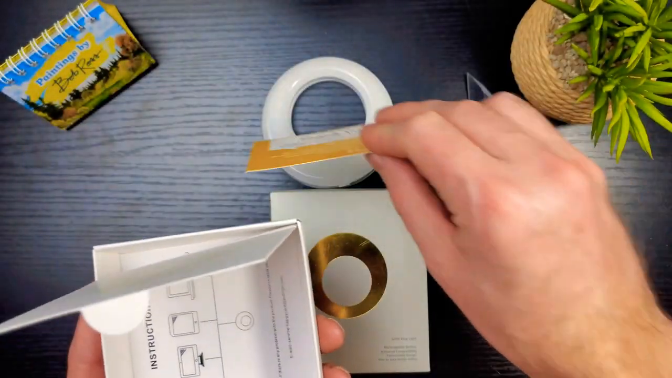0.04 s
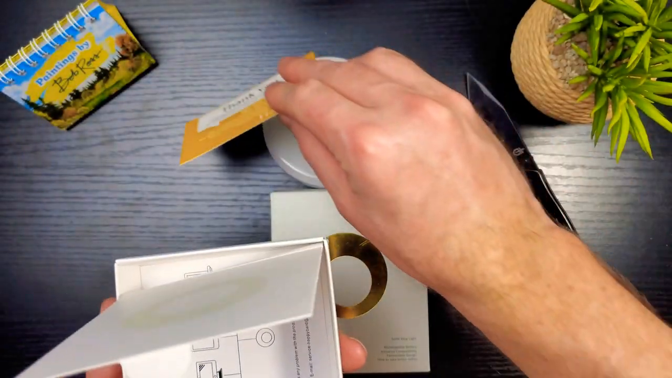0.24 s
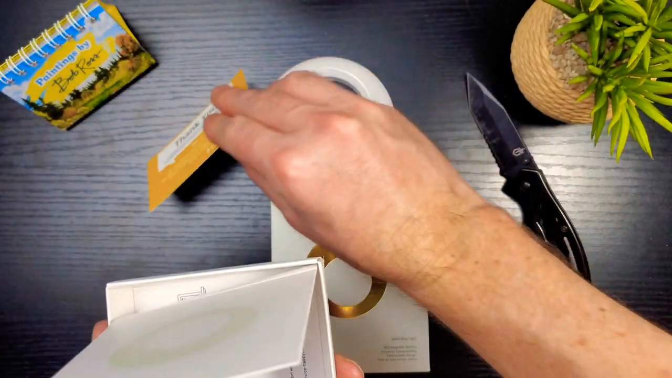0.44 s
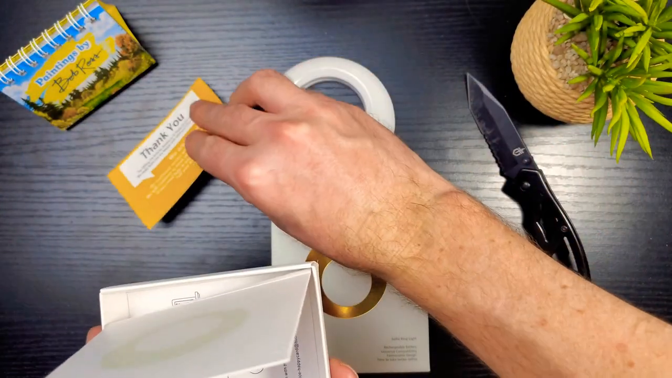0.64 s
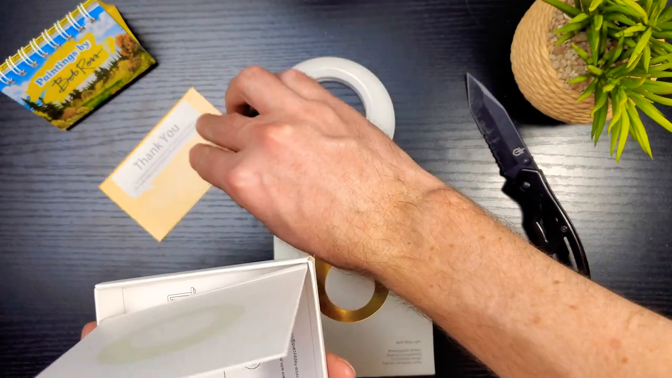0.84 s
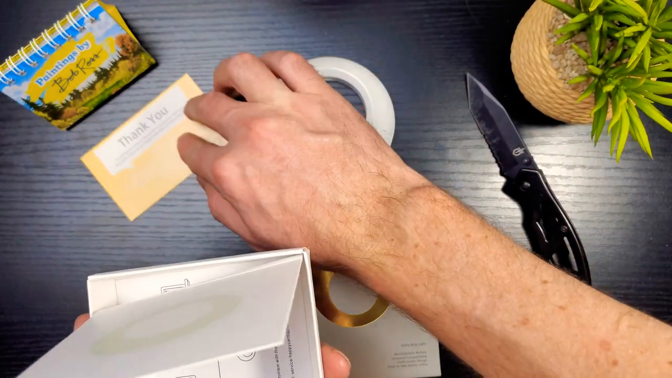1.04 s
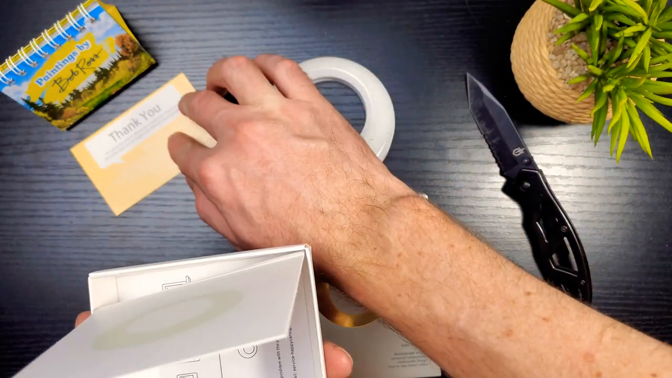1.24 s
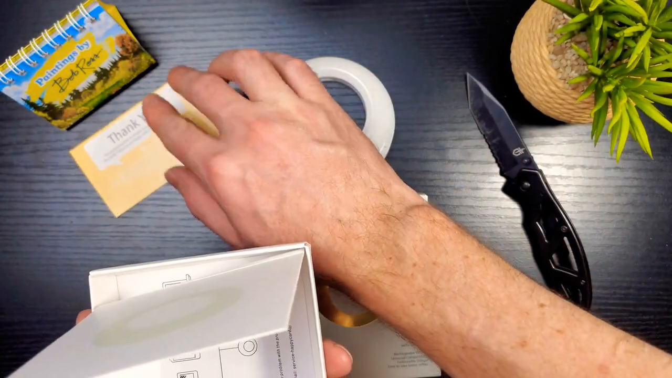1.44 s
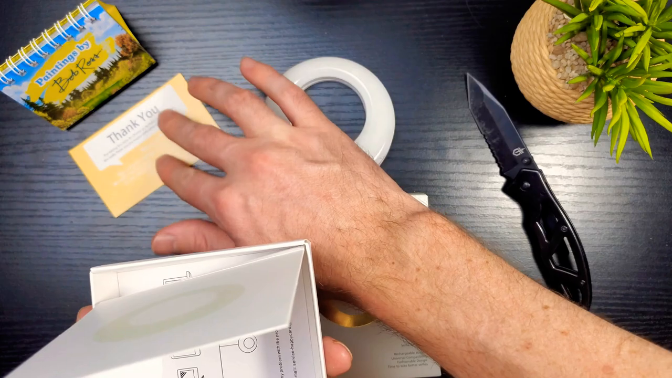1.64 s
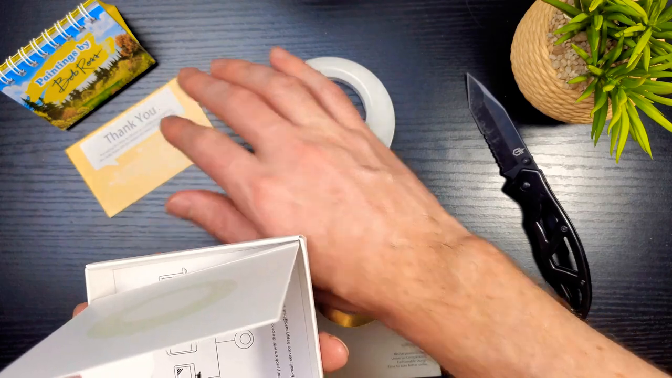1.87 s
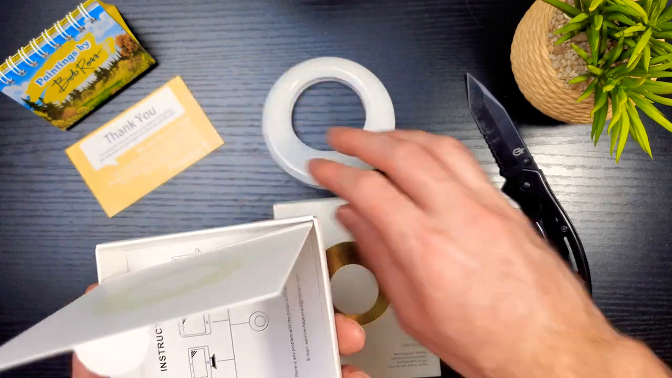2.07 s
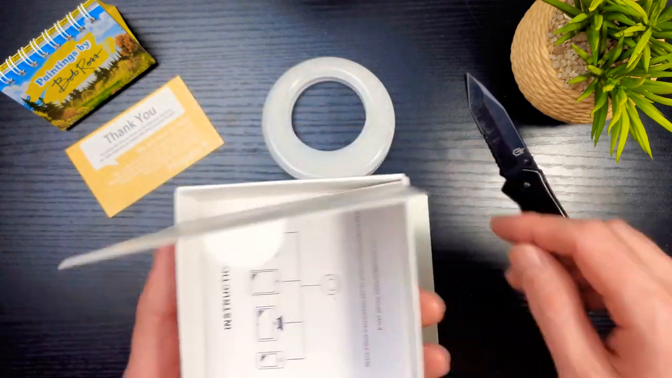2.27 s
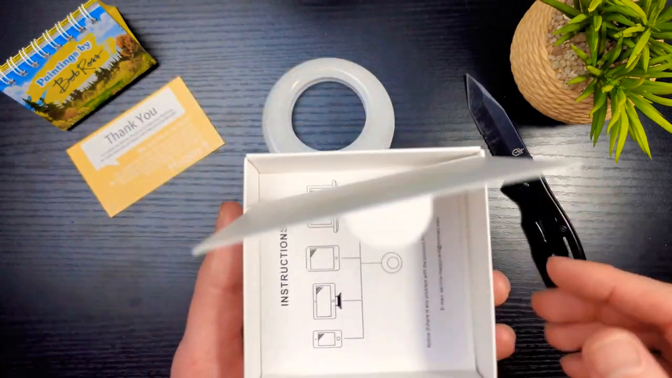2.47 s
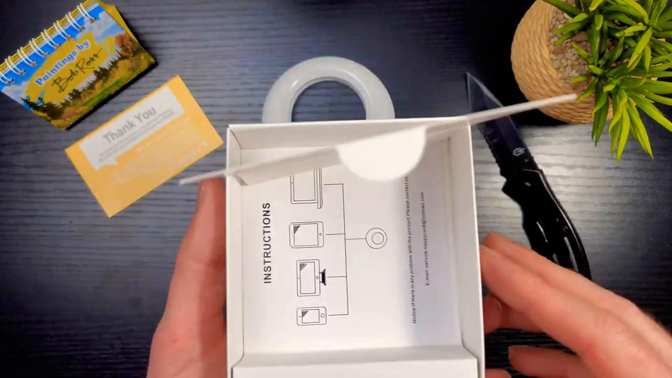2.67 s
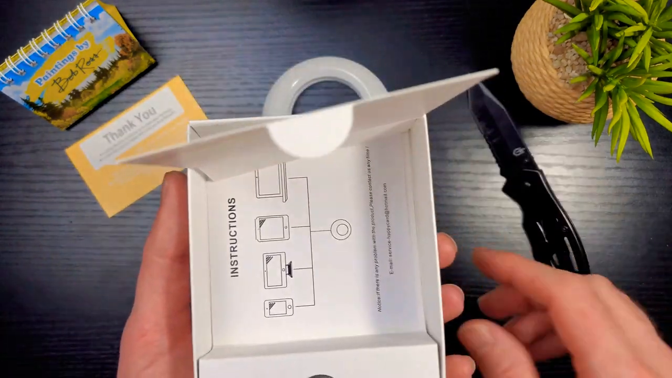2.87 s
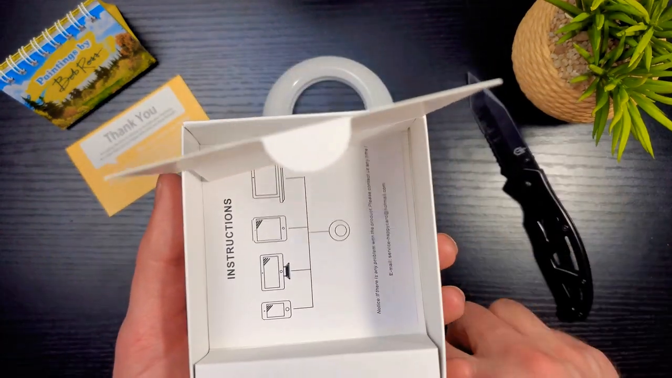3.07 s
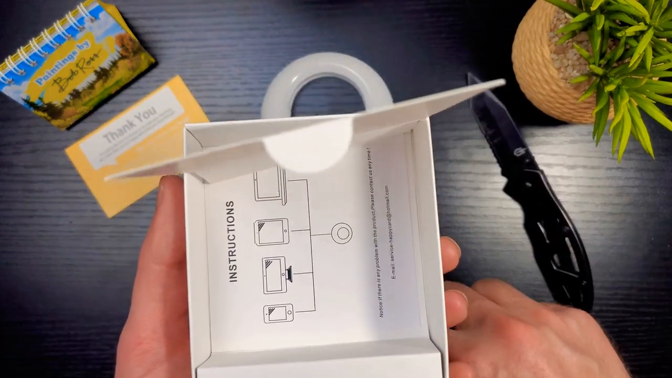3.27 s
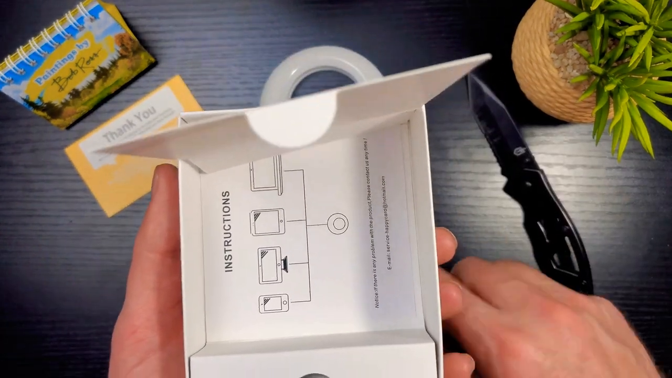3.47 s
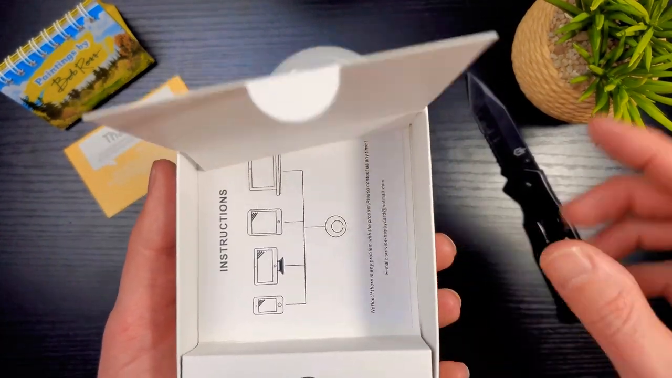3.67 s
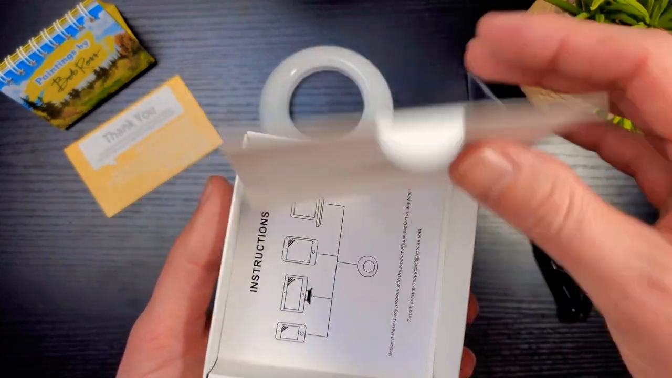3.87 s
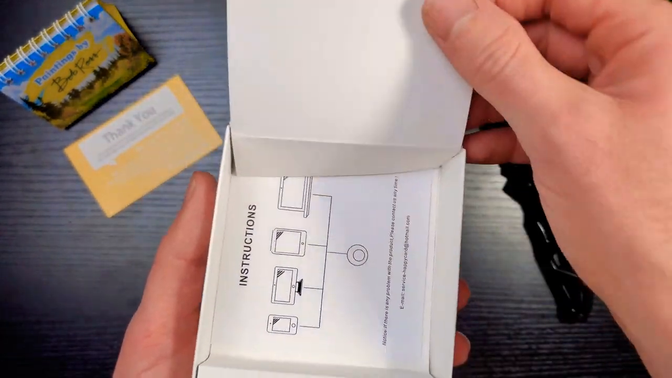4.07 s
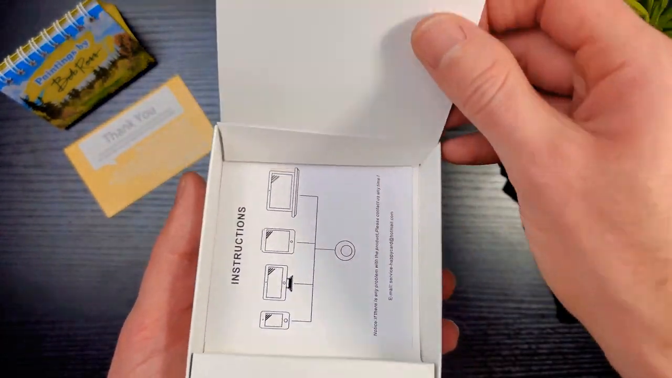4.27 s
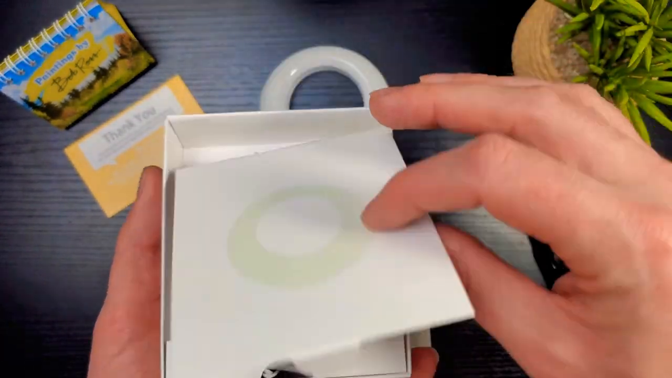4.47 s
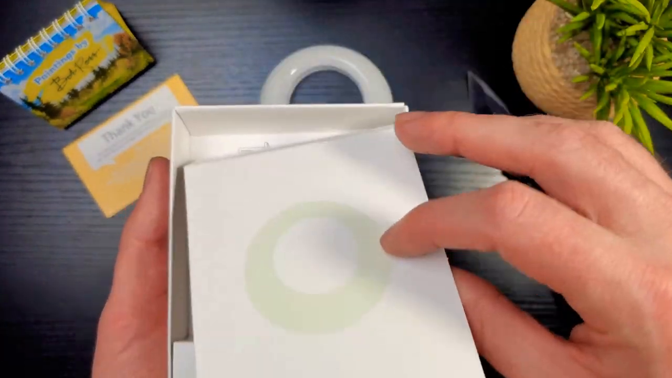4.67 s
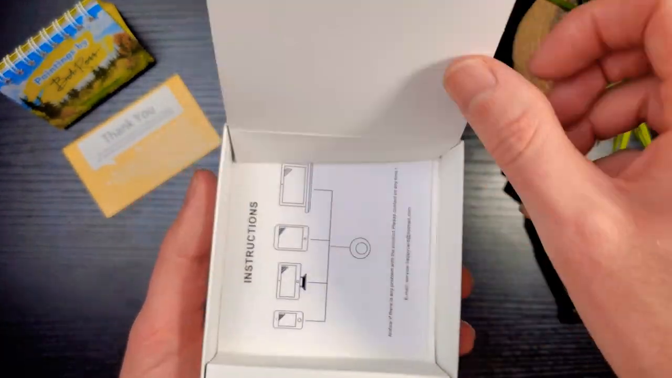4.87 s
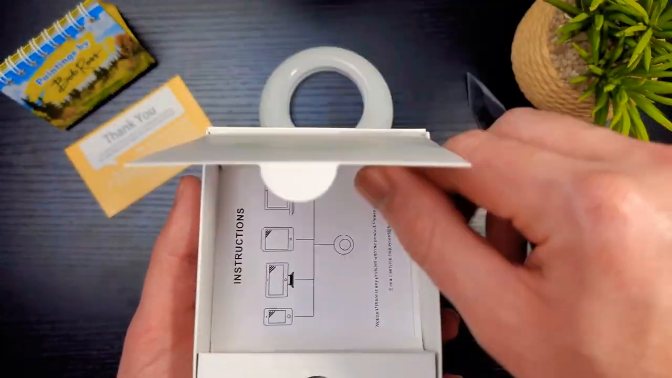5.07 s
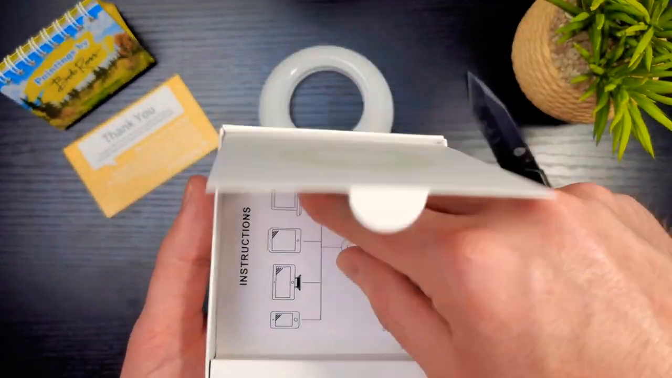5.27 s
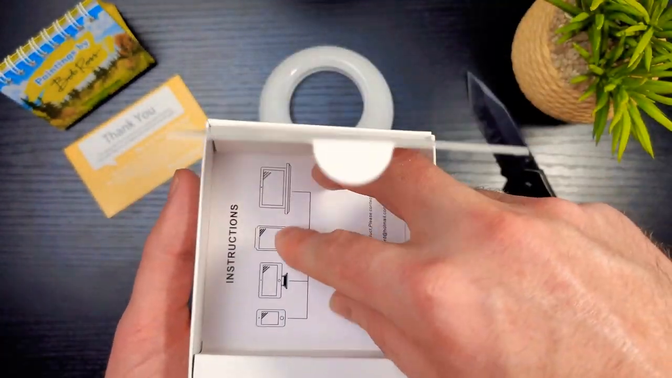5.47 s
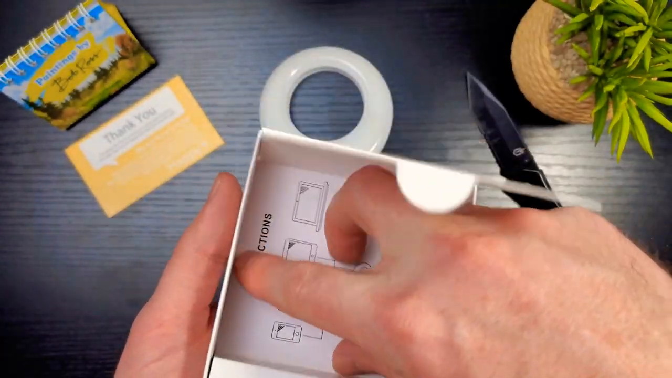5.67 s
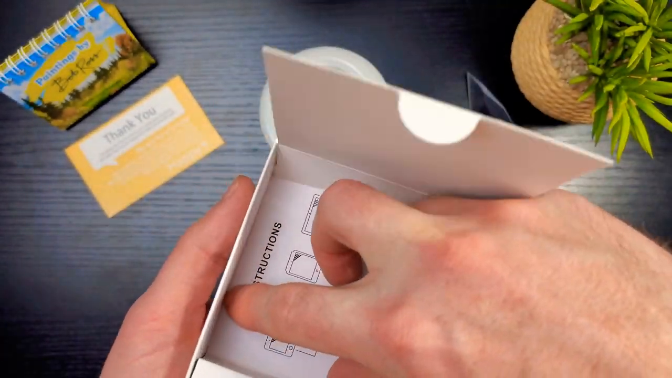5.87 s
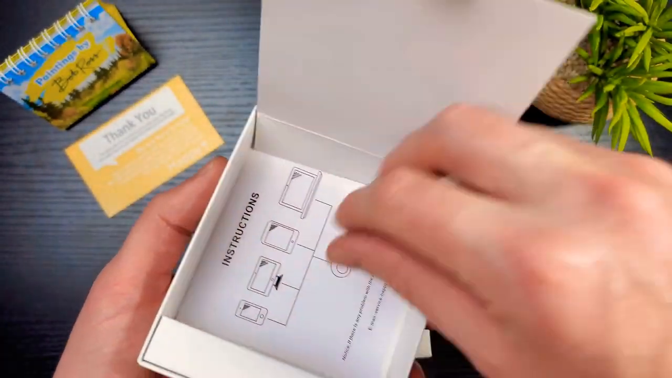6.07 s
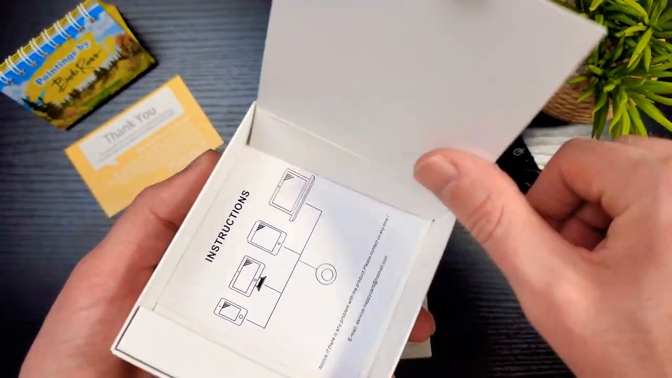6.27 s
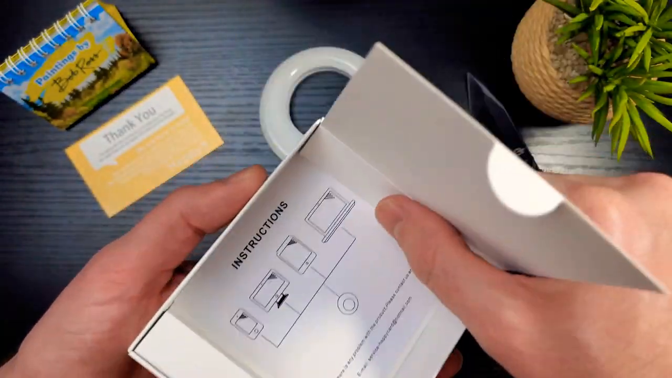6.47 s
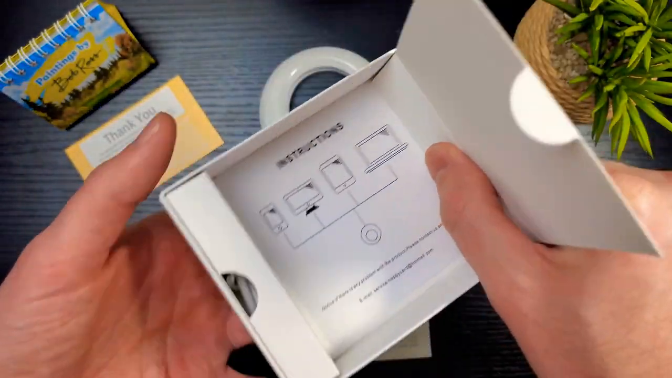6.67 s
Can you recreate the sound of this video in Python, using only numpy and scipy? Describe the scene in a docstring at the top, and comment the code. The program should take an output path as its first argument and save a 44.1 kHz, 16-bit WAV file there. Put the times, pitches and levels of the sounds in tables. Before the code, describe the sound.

Close to the microphone in a small quiet room, someone handles cardboard packaging. A card slides and slaps sharply onto a desk, and a hollow lid drags over the surface twice, with a lull between the pushes. The second half is busier: a box flap rasps against the walls and knocks repeatedly, the box thumps dully in the hand, and fingertips rub across coated paper.

```python
"""After a faint brush of fingers, a card skids and snaps onto a desk, close by. A loose cardboard lid is
pushed across the desk twice, juddering hollowly as its rim sticks and jumps. Then the inner flap of an
open box is worked to and fro: its edge scrapes and catches on the walls, the box thumps in the hand,
and fingers hiss over the paper. Each rub is a stream of tiny slips; each knock makes the box ring."""
import sys
import numpy as np
from scipy import signal
from scipy.io import wavfile
from scipy.ndimage import uniform_filter1d

SR = 44100
rng = np.random.default_rng(int(sys.argv[2]) if len(sys.argv) > 2 else 0)


def master(y):
    """Save y as 16-bit WAV."""
    cut = np.clip(np.atleast_2d(y).T, -1, 1)
    pcm = np.round(cut * 32767)  # scale
    wavfile.write(sys.argv[1], SR, pcm.astype(np.int16))


N = 296790
HZ = np.fft.rfftfreq(8192, 1 / SR)  # the frequencies at which tone curves are worked out

# The flap or a hand knocks the box. Each row: time in seconds, strength of the crack in dB,
# gain of its hollow part in dB, strength of the panel's swing in dB, panel pitch in Hz.
KNOCKS = [(0.099, -58.5, 10, -36.5, 149), (1.734, -56, 10, -27, 63.6), (3.9773, -12.5, -22.5, -2.5, 106),
          (4.006, -20, -10.5, -7.5, 98.6), (4.0339, -18, 1, -25, 69.5), (4.0477, -16, -16.5, -16, 58.5),
          (4.1387, -10, -14.5, -9, 137), (4.4709, -11.5, -10.5, -10, 119), (4.89, -4, -14.5, -12, 113.6),
          (4.9804, -18.5, -16, -17.5, 62.5), (5.108, -24, -1.5, -9, 94), (5.1339, -12, -9.5, -16, 79.5),
          (5.1539, -12, -12, -10, 148), (5.178, -10.5, -12, -15, 70), (5.198, -16.5, -8, -7, 73),
          (5.251, -7.5, -4.5, -7.5, 107), (5.2682, -15, -4.5, -18, 167), (5.2925, -9.5, -4.5, -18, 157),
          (5.2999, -9, -14, -9, 80), (5.3545, -16, -10, -15.5, 70.4), (5.4879, -18, -33, -28.5, 68),
          (5.622, -38, -20, -25.5, 74.4), (5.689, -29.5, -5, -22.5, 67.4), (5.812, -39, -15, -17.5, 77.8),
          (5.8294, -23.5, -33, -17.5, 61), (6.0672, -22.5, -6.5, -25, 90),
          (6.2064, -16.5, -10.5, -9.5, 65.6), (6.219, -30, -15, -5, 113), (6.2592, -14.5, -2, -1, 68.6),
          (6.303, -10, -11, -3, 94.6)]
# The broad tone of the flap's edge, the lid and the card. Each row: frequency in Hz, gain in dB.
EDGE_TONE = [(100, -11.5), (380, -11.5), (800, -21), (1200, -3), (2200, -14), (4200, -13), (5200, -13.5),
             (6400, -25), (8400, -14), (10500, -32), (15000, -27)]
LID_TONE = [(30, -33.5), (70, -17.5), (170, -17), (300, -11), (550, -8), (900, -11), (1300, -13.5),
            (1700, -24.5), (3000, -31.5), (5500, -32.5), (10000, -45), (15000, -46)]
CARD_TONE = [(100, -19.5), (300, -16.5), (750, -27), (1300, -10.5), (2500, -19), (4000, -22.5), (6000, -16),
             (8600, -17.5), (11000, -25), (15000, -27.5)]
# Where the edge and the card ring. Each row: frequency in Hz, width in Hz, boost in dB.
EDGE_MODES = [(1160, 37, 3.3), (1415, 450, 5.9), (2040, 400, 7.7), (2770, 70, 2.2), (3213, 620, 5.6),
              (4320, 150, 4.4)]
CARD_MODES = [(1480, 130, 6), (3430, 200, 8), (4407, 320, 12), (4870, 380, 11), (8600, 550, 2.6)]


def box_knocks(boost_db=38, wall_db=-7, slap_crisp_db=-15.5, tick_hollow_db=-15.5, lag_s=0.000965):
    """Each slap or catch of the flap rings the box; where it lands sets how hollow and crisp it is."""
    # The box's broad tone. Each row: frequency in Hz, gain in dB.
    box_tone = [(60, -10.5), (180, 5), (400, -2), (800, -10), (1300, -4), (2800, -16), (4600, -9.5),
                (6500, -14.5), (9000, -15.5), (15000, -25)]
    # Where the box rings. Each row: frequency in Hz, width in Hz, boost in dB.
    box_modes = [(405, 50, 4.56), (706, 36, 6.6), (1135, 130, 7.2), (1426, 50, 4.8), (1920, 130, 1.6),
                 (3006, 140, 2.6), (4640, 300, 5)]
    # An edge or fingertip catches lightly. Each row: time in seconds, strength in dB, treble gain in dB.
    ticks = [(1.059, -59, 4), (1.7327, -55, 4), (2.045, -35, -22), (2.366, -46, -20), (2.632, -40.5, -20),
             (2.748, -37.5, -19), (3.1917, -35.5, 4.5), (3.6653, -43, -21.5), (4.3055, -15, -12.5),
             (4.584, -33.5, -18.5), (4.801, -15, -40), (4.8563, -19.5, -19), (5.4704, -27, -11.5),
             (5.7644, -26.5, -14), (5.7759, -21, -21), (6.3643, -20.5, -26), (6.5198, -24.5, -11.5),
             (6.6986, -23.5, -12)]
    out = np.zeros(N)
    slaps = [(s, db, hollow_db, slap_crisp_db) for s, db, hollow_db, *_ in KNOCKS]
    catches = [(s, db, tick_hollow_db, crisp_db) for s, db, crisp_db in ticks]
    for s, db, hollow_db, crisp_db in slaps + catches:
        place_db = curve([(600, hollow_db), (1100, wall_db), (2600, wall_db), (4800, crisp_db)])
        gain_db = response(box_tone, box_modes) + place_db + ripple(spread_db=3)
        add(out, s + lag_s, amp(db + boost_db) * colour(impact(crush_s=0.0036, snap=0.55), gain_db))
    return out


def box_thumps(rise_s=0.0051, overtone_ratio=2.38, boost_db=4, swing_cycles=6.3, linger_s=0.093):
    """Every knock swings a panel for a few cycles, damped by the hand; its overtone dies sooner."""
    out, t = np.zeros(N), np.arange(SR // 3) / SR
    for s, _, _, db, hz in KNOCKS:
        linger = amp(-17.5 - 60 * t / linger_s)  # the whole box rings on faintly
        fade = amp(-60 * t * hz / swing_cycles) + linger
        phase = 2 * np.pi * hz * t
        swing = np.cos(phase) * fade + 0.199 * np.sin(overtone_ratio * phase) * fade ** 1.5
        add(out, s, amp(db + boost_db) * swing * (1 - np.exp(-t / rise_s)))
    return out


def flap_edge(skid_s=0.0091, skid_db=-22.5, skid_tilt_db=-6):
    """The cut edge rasps along the wall in coarse slips, and skids a little at every knock."""
    # Each row: start in seconds, length in seconds, level in dB, tilt to the treble in dB per octave.
    scrapes = [(2.525, 0.032, -39.5, -4.5), (2.619, 0.19, -60.5, -3.5), (3.66, 0.53, -63, -14),
               (4.083, 0.053, -26, 4.5), (4.22, 0.036, -27, -6), (4.274, 0.037, -27, -1.5),
               (4.332, 0.2, -46, -10), (4.649, 0.04, -37.5, -10.5), (4.739, 0.26, -44.5, 0),
               (5.047, 0.35, -45, -9), (5.19, 0.012, -19.5, -7.5), (5.25, 0.018, -27.5, -2),
               (5.484, 0.13, -47.5, 0.5), (5.612, 0.13, -41.5, -2.5), (5.762, .08, -43, -9.5),
               (5.883, .075, -44, -5), (6, 0.13, -44, -4.5), (6.193, 0.031, -34.5, -8.5),
               (6.506, 0.041, -40, -18.5), (6.554, 0.14, -56.5, -4)]
    out = np.zeros(N)
    skids = [(s, skid_s, db + skid_db, skid_tilt_db) for s, db, *_ in KNOCKS]
    for row in scrapes + skids:
        add(out, *stroke(row, response(EDGE_TONE, EDGE_MODES), rise_s=0.0061, release_s=0.067,
                         tilt_top_hz=3730, ripple_db=4.5, slips_per_s=1500, spread_db=3,
                         hiss=0.55, uneven_db=4.5, uneven_per_s=165.7))
    return out


def lid_judder(jolt_boost_db=23):
    """The lid's rim drags and judders over the desk, making the hollow lid ring."""
    # The lid is dragged. Each row: start in seconds, length in seconds, level in dB.
    pushes = [(0.844, 0.044, -37), (0.887, 0.063, -26.5), (.932, 0.042, -19), (3.218, 0.19, -20.5)]
    # The rim sticks and jumps. Each row: time in seconds, strength in dB.
    jolts = [(0.893, -17), (0.9446, -14.5), (.971, -18), (.982, -19.5), (3.2159, -20), (3.2245, -7),
             (3.3197, -5), (3.3411, -9), (3.357, -14)]
    # Where the lid rings. Each row: frequency in Hz, width in Hz, boost in dB.
    lid_modes = [(285, 200, 2.6), (552, 20, 7), (717, 150, 13), (1116, 150, 9), (1408, 70, 7),
                 (1850, 110, 10), (2400, 55, 3.3)]
    force = np.zeros(N)
    for s, length, db in pushes:
        speed = slide_speed(length, rise_s=0.0087, release_s=0.19)
        drag = friction(len(speed), slips_per_s=1400, spread_db=1, hiss=0.68,
                        uneven_db=0.5, uneven_per_s=160)
        add(force, s, amp(db) * speed * drag)
    for s, db in jolts:
        add(force, s, amp(db + jolt_boost_db) * impact(crush_s=0.0024, snap=0.8))
    return colour(force, unit_power(response(LID_TONE, lid_modes)))[:N]


def card_snap(squeak_at_s=0.8835, squeak_hz=4650, squeak_db=-7, swell_s=0.0015):
    """The card taps the desk; its bent corner slips off with a brief squeak, and it slaps flat."""
    # Each row: time in seconds, energy in dB, tilt to the treble in dB per octave.
    taps = [(0.5501, -7.5, -8), (.8815, 8.5, 2.5), (0.8923, 9, 1.5)]
    out, t = np.zeros(N), np.arange(-SR // 50, SR // 100) / SR
    pitch_hz = squeak_hz * (1 + 0.08 * waver(len(t), per_s=900))
    squeak = np.exp(-abs(t) / swell_s) * np.sin(2 * np.pi * np.cumsum(pitch_hz) / SR)
    add(out, squeak_at_s + t[0], amp(squeak_db) * squeak)
    for s, db, tilt_db in taps:
        gain_db = response(CARD_TONE, CARD_MODES) + tilt(tilt_db, top_hz=9000)
        add(out, s, amp(db) * colour(impact(crush_s=0.0051, snap=0.5), unit_power(gain_db)))
    return out


def card_slide():
    """The thin card skids on the desk in fine, fast slips."""
    # Each row: start in seconds, length in seconds, level in dB, tilt to the treble in dB per octave.
    slides = [(0.567, 0.087, -43.5, -2.5), (0.704, 0.045, -35, -0.5), (.78, 0.069, -44, 1),
              (0.844, 0.061, -28, 0.5), (0.913, 0.027, -44.5, 5)]
    out = np.zeros(N)
    for row in slides:
        add(out, *stroke(row, response(CARD_TONE, CARD_MODES), rise_s=0.018, release_s=0.25,
                         tilt_top_hz=9000, ripple_db=4, slips_per_s=3500, spread_db=-1,
                         hiss=0.27, uneven_db=-4, uneven_per_s=96))
    return out


def fingers():
    """Skin slides on coated paper: a fine, bright hiss with tiny catches."""
    # Each row: start in seconds, length in seconds, level in dB, tilt to the treble in dB per octave.
    rubs = [(0, 0.02, -49, 2), (0.089, 0.093, -56, -2.5), (0.228, 0.091, -60.5, -4.5),
            (1.039, 0.071, -49.5, 0.5), (1.124, 0.18, -56.5, -2.5), (1.731, 0.037, -51.5, 3.5),
            (2.019, 0.055, -52, -2), (2.497, 0.068, -46, -0.5), (3.148, 0.15, -52, -3),
            (3.967, 2.3, -55.5, -8), (4.038, 0.059, -39, -3), (4.163, 0.027, -41, -3),
            (4.343, 0.13, -43.5, -4), (4.393, 0.041, -33, 2.5), (4.77, 0.16, -40.5, 3),
            (5.035, .17, -37, -2), (5.259, 0.09, -38.5, -4.5), (5.488, 0.033, -39.5, 16),
            (5.612, .12, -46.5, -3.5), (5.762, 0.091, -44, -5.5), (6.007, 0.17, -45, -2),
            (6.088, 0.15, -38.5, -0.5), (6.314, 0.22, -37.5, 0.5), (6.554, 0.13, -37, 0.5)]
    # The tone of skin on paper. Each row: frequency in Hz, gain in dB.
    skin_tone = [(200, -24.5), (400, -31), (750, -17), (1400, -3.5), (2800, -12.5), (5000, -5), (6600, -10),
                 (8400, -3.5), (11300, -14), (15000, -10)]
    out = np.zeros(N)
    for row in rubs:
        add(out, *stroke(row, curve(skin_tone), rise_s=0.018, release_s=0.11,
                         tilt_top_hz=14500, ripple_db=4.5, slips_per_s=1700, spread_db=2.5,
                         hiss=0.65, uneven_db=3.5, uneven_per_s=81))
    return out


def snags(rubbing, snags_per_s=35, boost_db=14, spread_db=2):
    """Now and then a fibre or a nail snags: tiny dry ticks, louder when the rubbing is harder."""
    moments = rng.random(N) < snags_per_s / SR
    sizes = amp(boost_db + spread_db * np.minimum(rng.exponential(1, N), 2))
    clicks = moments * sizes * effort(rubbing, samples=1500)
    return colour(clicks, unit_power(response(EDGE_TONE, EDGE_MODES)))[:N]


def grip(rubbing, rumble_db=-11):
    """The holding hand shifts as the other one rubs: a soft rumble that follows the effort."""
    # Each row: frequency in Hz, gain in dB.
    hand_tone = [(20, -12.5), (55, 0.5), (110, 1.5), (250, -21.5), (700, -44), (2000, -75.5)]
    rumble = colour(rng.standard_normal(N), curve(hand_tone))[:N]
    return amp(rumble_db) * effort(rubbing, samples=3000) * unit_level(rumble)


def lid_creep(start_s=1.0, length_s=0.08, level_db=-46, tilt_db=-24):
    """After the first push the lid creeps on with a dull, faint rub."""
    out = np.zeros(N)
    add(out, *stroke((start_s, length_s, level_db, tilt_db), curve(LID_TONE), rise_s=0.02, release_s=0.9,
                     tilt_top_hz=3065, ripple_db=5, slips_per_s=490, spread_db=8,
                     hiss=0.88, uneven_db=-2.5, uneven_per_s=28))
    return out


def room(x, width, echoes_per_s=3000, side_top_hz=700):
    """A small furnished room echoes: the bass lasts longest, and the treble is alike in both ears."""
    # Each row: frequency in Hz, seconds an echo takes to fade by 60 dB.
    fade_times = [(80, 0.85), (400, 0.16), (1500, 0.067), (6000, 0.11), (15000, 0.12)]
    echoes = rng.choice([-1., 1.], (2, SR // 2)) * (rng.random((2, SR // 2)) < echoes_per_s / SR)
    echoes[:, :SR // 300] = 0  # the gap before the first echo
    hz, t, spectrum = signal.stft(echoes, SR, nperseg=256)
    fade = amp(-60 * t / curve(fade_times, hz)[:, None])
    tail = signal.istft(spectrum * fade, SR, nperseg=256)[1]
    mid, side = signal.fftconvolve(x[None], tail / np.linalg.norm(tail[0]), axes=1)[:, :N]
    side = width * signal.sosfilt(signal.butter(1, side_top_hz, fs=SR, output="sos"), side)
    return np.array([mid + side, mid - side])


def air(noise_db=-52.5):
    """Low rumble and faint hiss, with a weak mains hum."""
    # The tone of the quiet room. Each row: frequency in Hz, gain in dB.
    air_tone = [(15, -50), (25, -25), (39, -11), (62, -7), (115, -15.5), (160, -25.5), (260, -26.5),
                (390, -35), (600, -41.5), (820, -39.5), (2100, -46), (5400, -45), (16000, -52.5)]
    noise = colour(rng.standard_normal(N + SR), curve(air_tone))[SR:SR + N]
    t = np.arange(N) / SR
    hum = sum(amp(db) * np.sin(2 * np.pi * hz * t) for hz, db in [(59.5, -59.5), (120, -58)])
    return amp(noise_db) * unit_level(noise) + hum


def stroke(row, gain_db, rise_s, release_s, tilt_top_hz, ripple_db, **grain):
    """One slide: friction follows the speed and rings the sheet. Gives its start time and sound."""
    start, length, db, tilt_db = row
    speed = slide_speed(length, rise_s, release_s)
    gain_db = gain_db + tilt(tilt_db, tilt_top_hz)
    travel = np.pi / 2 * np.minimum(np.arange(len(speed)) / SR / length, 1)
    out = 0
    # as the contact travels, one set of the sheet's small resonances gives way to another
    for share in np.cos(travel), np.sin(travel):
        force = amp(db) * share * speed * friction(len(speed), **grain)
        out = out + colour(force, unit_power(gain_db + ripple(ripple_db)))
    return start, out


def slide_speed(length, rise_s, release_s):
    """A slide picks up speed, holds until its length is up, then dies away by 60 dB in release_s."""
    t = np.arange(0, length + release_s, 1 / SR)
    stopping = amp(-60 * np.maximum(t - length, 0) / release_s)
    return np.sin(np.pi / 2 * np.minimum(t / rise_s, 1)) * stopping


def friction(n, slips_per_s, spread_db, hiss, uneven_db, uneven_per_s):
    """Fibres let go in tiny slips of unequal size over a smooth hiss, under an unsteady pressure."""
    slips = (rng.random(n) < slips_per_s / SR) * rng.choice([-1, 1], n)
    sizes = amp(spread_db * np.minimum(rng.exponential(1, n), 3))
    rub = unit_level(slips * sizes) + hiss * rng.standard_normal(n)
    pressure = amp(uneven_db * waver(n, uneven_per_s))
    return unit_level(rub * pressure)


def impact(crush_s, snap):
    """A hit of energy 1: one sharp snap, then fibres crushing for a moment."""
    t = np.arange(SR // 30) / SR
    force = rng.standard_normal(len(t)) * np.exp(-t / crush_s)
    force /= np.linalg.norm(force)
    force[0] += snap
    return force / np.linalg.norm(force)


def effort(rubbing, samples):
    """How strong the rubbing is, averaged over a short moment."""
    return np.sqrt(abs(uniform_filter1d(rubbing ** 2, size=samples)))


def response(tone, modes):
    """Gain in dB of a broad tone with ringing peaks (resonances) standing out of it."""
    return curve(tone) + sum(db / (1 + (2 * (HZ - hz) / width) ** 2) for hz, width, db in modes)


def tilt(tilt_db, top_hz):
    """A sharper contact leans to the treble: about tilt_db per octave from 1000 Hz up to top_hz."""
    return tilt_db * np.log2(1 + np.minimum(HZ, top_hz) / 1000)


def ripple(spread_db):
    """The many small resonances of a sheet, different at each place of contact."""
    return spread_db * np.interp(HZ, np.geomspace(200, 16000, num=110), rng.standard_normal(size=110))


def colour(x, gain_db):
    """Gives a sound a tone curve, so that ringing comes after each hit and never before it."""
    log_gain = np.log(amp(np.r_[gain_db, gain_db[-2:0:-1]]))
    ring = np.fft.ifft(np.exp(np.conj(signal.hilbert(log_gain)))).real
    return signal.fftconvolve(x, ring[:len(ring) // 2])


def curve(points, hz=HZ):
    """Joins (Hz, value) points with lines, giving each octave equal room."""
    point_hz, value = np.transpose(points)
    return np.interp(np.log(hz + 1), np.log(point_hz + 1), value)


def waver(n, per_s):
    """A random drift of about 1 either way, turning per_s times a second."""
    at = np.arange(n) * per_s / SR
    turns = int(at[-1]) + 2
    return np.interp(at, np.arange(turns), rng.standard_normal(turns))


def unit_power(gain_db):
    """Shifts a tone curve so that white noise keeps its level."""
    return gain_db - 10 * np.log10(np.mean(amp(gain_db) ** 2))


def unit_level(x):
    """Scales a sound to an average (rms) level of 1."""
    return x / np.sqrt(np.mean(x ** 2) + 1e-20)


def amp(db):
    """Turns dB into a multiplier."""
    return 10 ** (np.asarray(db) / 20)


def add(mix, s, sound):
    """Mixes a sound in at s seconds."""
    part = mix[max(round(s * SR), 0):][:len(sound)]
    part += sound[:len(part)]


def scene():
    """The box in the hand and the things on the desk, in a small quiet room."""
    rubbing = flap_edge() + fingers()
    in_hand = rubbing + box_knocks() + box_thumps() + grip(rubbing) + snags(rubbing)
    on_desk = card_slide() + card_snap() + lid_judder() + lid_creep()
    slightly_left = amp([[0.2], [-0.2]])
    echoes = room(amp(-21) * in_hand, width=0.02) + room(amp(-20.5) * on_desk, width=0.2)
    return in_hand + on_desk * slightly_left + echoes + air()


def record(dry, low_cut_hz=24, ceiling=1.05, high_cut_hz=15700):
    """Cuts the deepest bass, rounds off the sharpest peaks, then cuts the highest treble."""
    dry = signal.sosfilt(signal.butter(2, low_cut_hz, "highpass", fs=SR, output="sos"), dry)
    rounded = dry / (1 + (dry / ceiling) ** 4) ** (1 / 4)
    treble_cut = signal.firwin(401, high_cut_hz, window=("kaiser", 8), fs=SR)
    return signal.oaconvolve(rounded, treble_cut[None], "same")


dry = scene()
out = record(dry)
master(out)
```